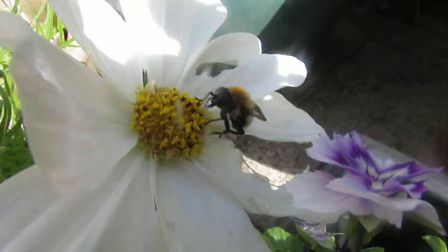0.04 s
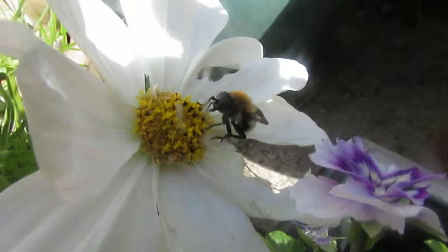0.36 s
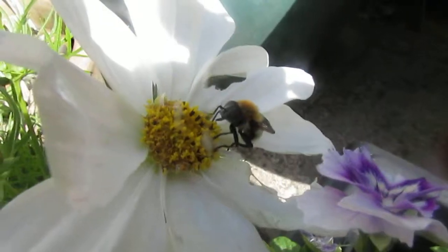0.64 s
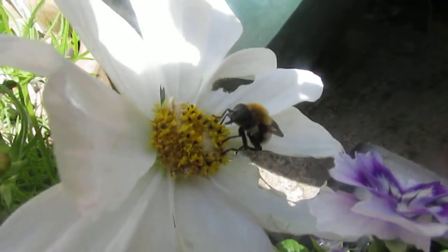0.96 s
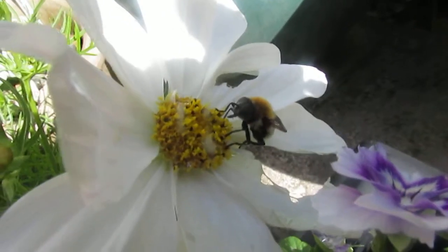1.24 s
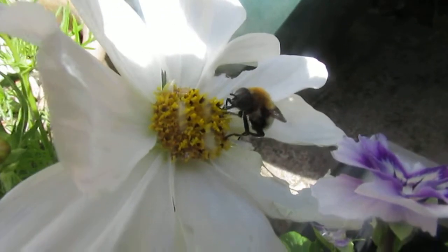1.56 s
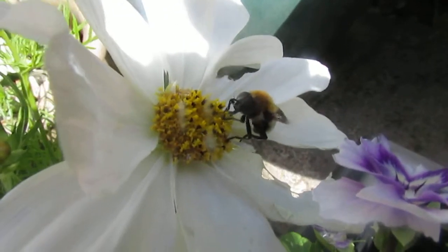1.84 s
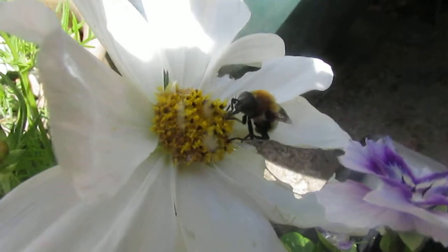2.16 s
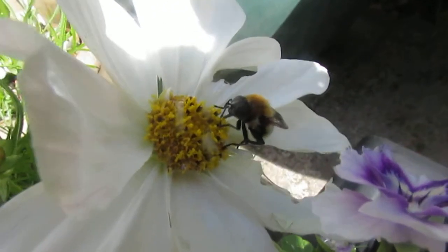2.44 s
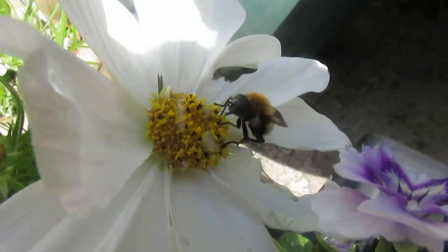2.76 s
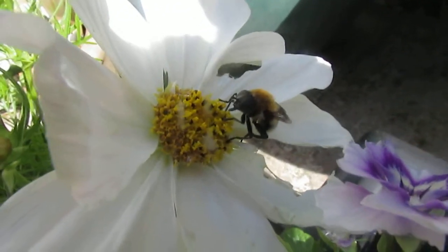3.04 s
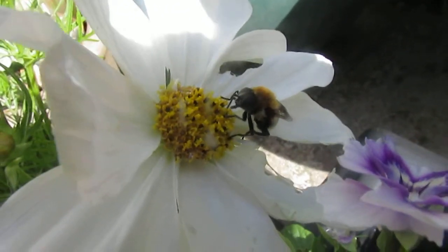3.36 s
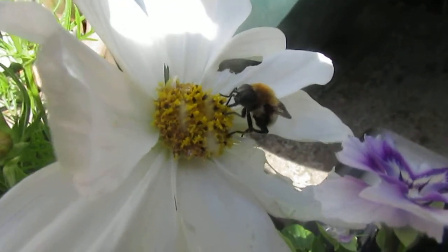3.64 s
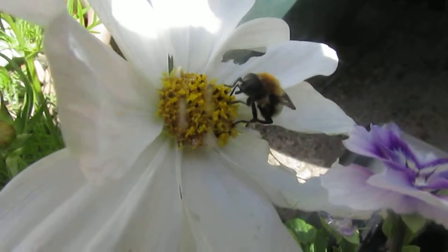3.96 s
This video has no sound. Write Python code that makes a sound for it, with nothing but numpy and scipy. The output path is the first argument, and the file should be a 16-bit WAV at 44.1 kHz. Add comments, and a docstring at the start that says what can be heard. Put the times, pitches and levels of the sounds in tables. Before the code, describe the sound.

Dull, even rumble of far traffic over a garden, with faint hiss and light handling thumps.

```python
"""After a moment of silence, a steady wash of distant traffic and air fills a quiet garden.
With it come microphone hiss, the thin whine of a hand-held camera's electronics, the weak hum
of a far motor and a faint, wavering drone. The hand bumps the camera softly four times,
a far bird calls once, and leaves stir near the end. The sound is mono."""
import sys
import numpy as np
from scipy import signal
from scipy.fft import rfft, irfft
from scipy.io import wavfile

SR = 44100
rng = np.random.default_rng(int(sys.argv[2]) if len(sys.argv) > 2 else 0)


def file_out(sig):
    """Save sig as 16-bit WAV at sys.argv[1]."""
    # one column per channel
    cols = np.atleast_2d(sig).T
    # limit, then scale
    lim = np.clip(cols, -1, 1)
    pcm = np.round(lim * 32767).astype(np.int16)
    wavfile.write(sys.argv[1], SR, pcm)


N = 176400
T = np.arange(N) / SR

# spectrum of distant traffic and air: (frequency [Hz], relative density [dB])
WASH_SPECTRUM = [(12, -22), (22, -11), (40, -6), (60, -1.5), (130, -0.5), (240, -.5), (400, -3), (600, -5),
                 (850, -7), (1150, -9.5), (2000, -15.5), (3000, -19.5), (4200, -24), (8000, -33),
                 (16000, -44)]
# spectrum of the microphone hiss: (frequency [Hz], relative density [dB])
HISS_SPECTRUM = [(1000, -3.5), (3000, 0.5), (5200, 1), (7500, -0.5), (9000, -2.5), (10200, -4.5),
                 (11800, -6.2), (13500, -10), (15700, -16.5)]
# a tone of the electronics and its sidebands: (frequency [Hz], rms level [dB])
WHINE_LINES = [(11703, -94), (11763, -88), (11793, -88), (11823, -80.5), (11883, -92)]
# envelope of the motor hum: (time [s], rms level [dB])
HUM_ENVELOPE = [(.3, -66), (.52, -54), (.75, -64), (1.1, -60), (2.3, -76), (3.3, -67), (3.6, -59), (4, -64)]
# course of the drone in the traffic: (time [s], frequency [Hz], rms level [dB])
DRONE_COURSE = [(.3, 160, -63), (.6, 163, -62), (.95, 177, -53.5), (1.4, 188.7, -61), (1.8, 195, -63),
                (2.25, 191, -54.5), (2.55, 188, -75), (4, 190, -82)]
# bumps of the hand on the camera: (onset [s], level [dB], rocking frequency [Hz])
HAND_BUMPS = [(.889, -47, 160), (1.211, -30.5, 136), (1.372, -41, 60), (1.573, -37, 70)]
# the bird's note: (centre time [s], duration [s], frequency [Hz], peak level [dB])
BIRD_NOTE = (2.902, .085, 8330, -63.5)
# brushes of the leaves: (centre time [s], duration [s], rms level at the centre [dB])
LEAF_BRUSHES = [(3.548, .02, -60), (3.75, .6, -65), (3.81, .07, -61), (3.92, .03, -59)]
# spectrum of the leaves: (frequency [Hz], relative density [dB])
LEAF_SPECTRUM = [(800, -20), (3800, 4), (9500, -4), (15000, -17)]

WASH_DB, WASH_SWAY_DB, WASH_SWAY_PER_S = -44.5, 0.1, 2.9
HISS_DB = -60.5
HUM_HZ, HUM_WANDER_HZ = 56.6, 0.89
DRONE_WANDER_HZ = 4.16
BUMP_CYCLES = 1.16   # the rocking rises and dies within this many cycles
KNOCK_HZ, KNOCK_RELATIVE_DB, KNOCK_T60_S = 430, -10, .05
BIRD_RISE_HZ_PER_S, BIRD_WAVER_HZ = 1500, 30
NOTCH_HZ, NOTCH_WIDTH_HZ, NOTCH_DEPTH = 7868, 210, .83
START_S, CUTOFF_HZ = .2425, 15800


def from_db(db):
    """Amplitude grows tenfold for every 20 dB."""
    return 10 ** (np.asarray(db) / 20)


def unit_rms(x):
    """Normalisation: dividing by the rms gives unit power."""
    return x / np.sqrt(np.mean(x ** 2) + 1e-20)


def drift(corner_hz):
    """Low-pass filtering turns white noise into a random wander of unit rms."""
    hz = np.arange(N // 2 + 1) * SR / N
    white = rfft(rng.standard_normal(N))
    return unit_rms(irfft(white * (hz > 0) / (1 + (hz / corner_hz) ** 2), N))


def coloured_noise(spectrum):
    """Spectral shaping: white noise weighted by the given spectrum, at unit rms."""
    hz = np.maximum(np.arange(N // 2 + 1) * SR / N, 1)
    points_hz, points_db = np.transpose(spectrum)
    gain = from_db(np.interp(np.log(hz), np.log(points_hz), points_db))
    return unit_rms(irfft(rfft(rng.standard_normal(N)) * gain, N))


def tone(hz):
    """Phase is the integral of frequency: a sine of unit peak follows the given pitch."""
    return np.sin(2 * np.pi * np.cumsum(hz) / SR)


def swell(centre, duration):
    """A Hann window: a smooth rise and fall about the centre time."""
    return np.cos(np.pi * np.clip((T - centre) / duration, -.5, .5)) ** 2


def distant_wash():
    """Incoherent addition: far traffic and moving air merge into a dull, barely swaying noise."""
    level_db = WASH_DB + WASH_SWAY_DB * drift(WASH_SWAY_PER_S)
    return from_db(level_db) * coloured_noise(WASH_SPECTRUM)


def electronics():
    """Beating: closely spaced steady tones interfere as a thin whine over the microphone's hiss."""
    whine = sum(from_db(db) * np.sin(2 * np.pi * (hz * T + rng.random())) for hz, db in WHINE_LINES)
    hiss = from_db(HISS_DB) * coloured_noise(HISS_SPECTRUM)
    return hiss + np.sqrt(2) * whine


def far_motor():
    """Amplitude modulation: a motor's low, wavering tone swells and sinks into the wash."""
    pitch = HUM_HZ + HUM_WANDER_HZ * drift(1.5)
    level_db = np.interp(T, *np.transpose(HUM_ENVELOPE))
    return np.sqrt(2) * from_db(level_db) * tone(pitch)


def far_drone():
    """Frequency modulation: a tone, perhaps a far engine, climbs unsteadily and fades past half-way."""
    times, hz, db = np.transpose(DRONE_COURSE)
    pitch = np.interp(T, times, hz) + DRONE_WANDER_HZ * drift(8.9)
    return np.sqrt(2) * from_db(np.interp(T, times, db)) * tone(pitch)


def hand_bumps():
    """Impact excitation: each bump rocks the camera briefly and rings a damped mode of its body."""
    bumps = np.zeros(N)
    for onset, db, hz in HAND_BUMPS:
        age = np.clip(T - onset, 0, 1)
        cycles = np.minimum(age * hz, BUMP_CYCLES)
        rock = np.sin(np.pi * cycles / BUMP_CYCLES) * np.sin(2 * np.pi * cycles)
        knock_envelope = from_db(KNOCK_RELATIVE_DB - 60 * age / KNOCK_T60_S)
        knock = knock_envelope * np.sin(2 * np.pi * KNOCK_HZ * age)
        bumps += from_db(db) * (rock + knock)
    return bumps


def far_bird():
    """A linear chirp: one short, high note rises slightly, with a random waver in pitch."""
    centre, duration, hz, db = BIRD_NOTE
    rise = BIRD_RISE_HZ_PER_S * np.clip(T - centre, -duration, duration)
    pitch = hz + rise + BIRD_WAVER_HZ * drift(80)
    return from_db(db) * swell(centre, duration) * tone(pitch)


def leaves():
    """Friction noise: brushing leaves give faint, bright swells."""
    return sum(from_db(db) * swell(centre, duration) * coloured_noise(LEAF_SPECTRUM)
               for centre, duration, db in LEAF_BRUSHES)


def scene():
    """Superposition: all sources add into one signal that feeds both channels alike."""
    background = distant_wash() + far_motor() + electronics()
    mono = background + far_drone() + hand_bumps() + far_bird() + leaves()
    return np.array([mono, mono])


def record(dry):
    """Filtering and gating: the camera notches one narrow band, switches on and cuts the top treble."""
    band_pass = signal.iirpeak(NOTCH_HZ, NOTCH_HZ / NOTCH_WIDTH_HZ, fs=SR)
    notched = dry - NOTCH_DEPTH * signal.lfilter(*band_pass, dry)
    gated = notched * (T >= START_S)
    low_pass = signal.ellip(12, .1, 80, CUTOFF_HZ, fs=SR, output="sos")
    return signal.sosfilt(low_pass, gated + 1e-18)


dry = scene()
out = record(dry)
file_out(out)
```